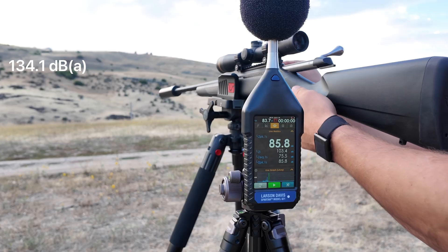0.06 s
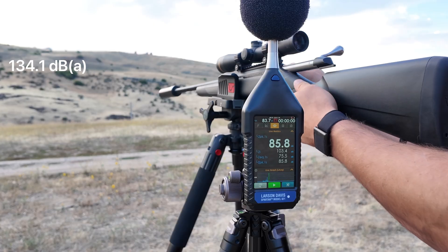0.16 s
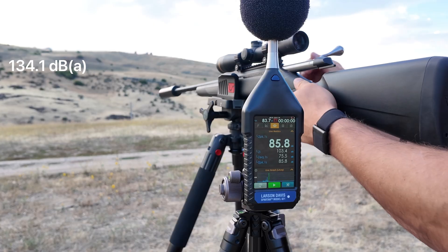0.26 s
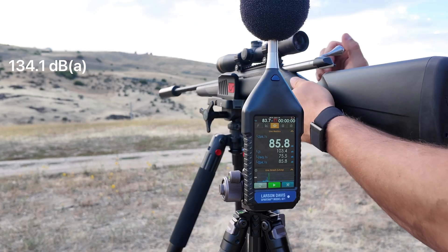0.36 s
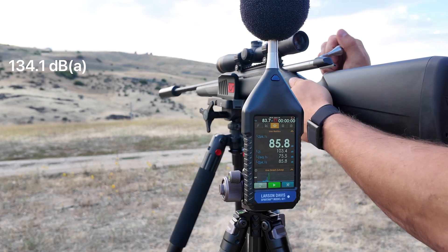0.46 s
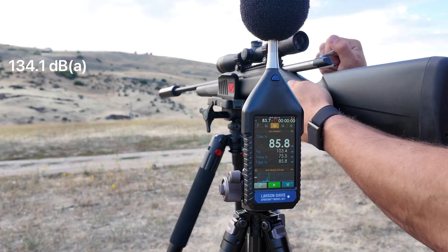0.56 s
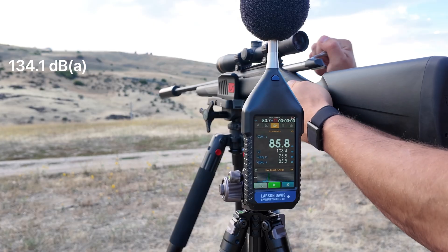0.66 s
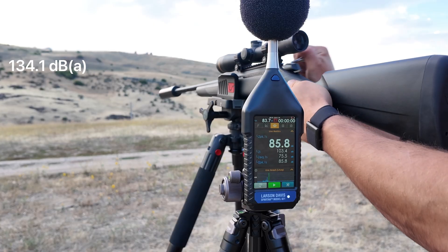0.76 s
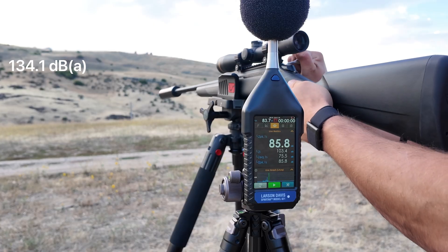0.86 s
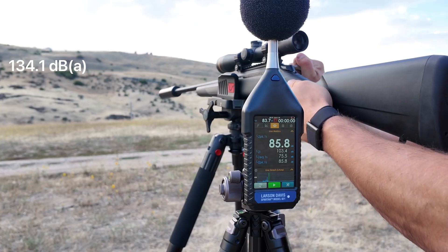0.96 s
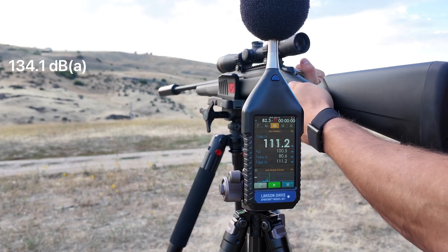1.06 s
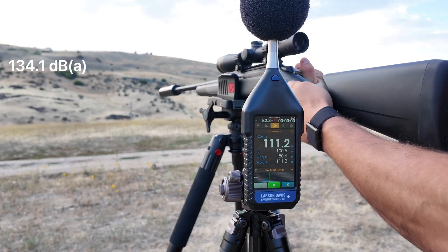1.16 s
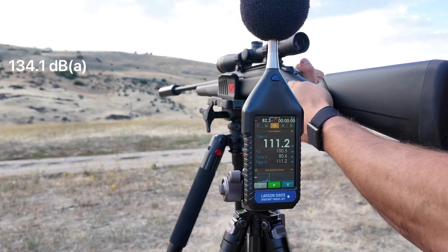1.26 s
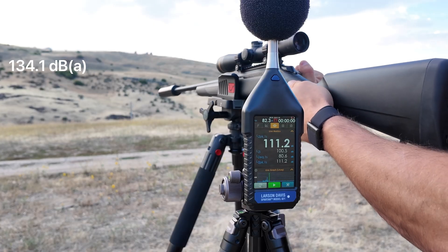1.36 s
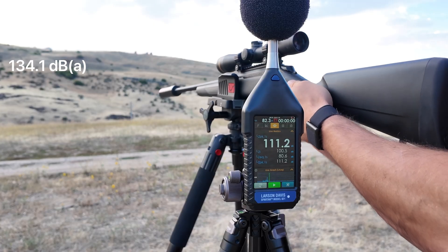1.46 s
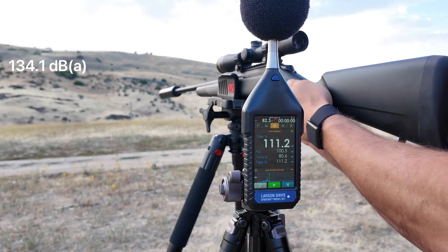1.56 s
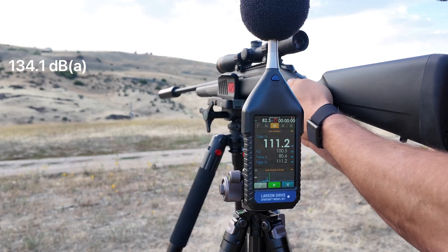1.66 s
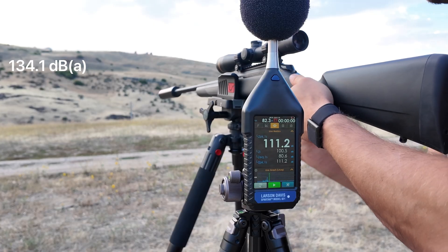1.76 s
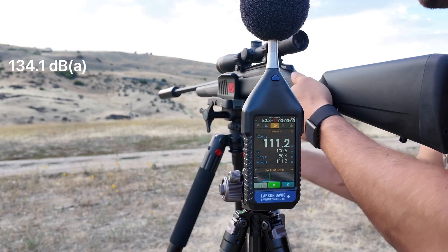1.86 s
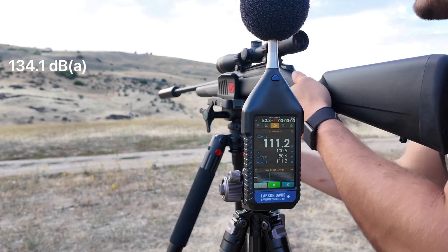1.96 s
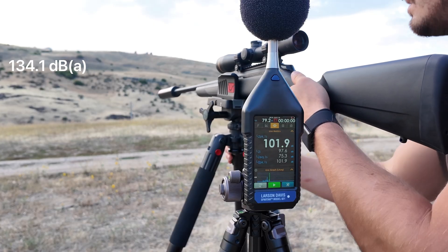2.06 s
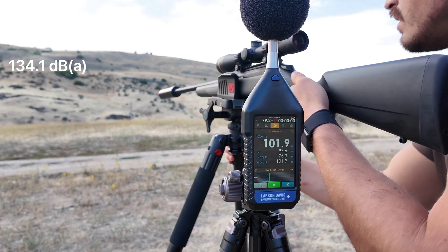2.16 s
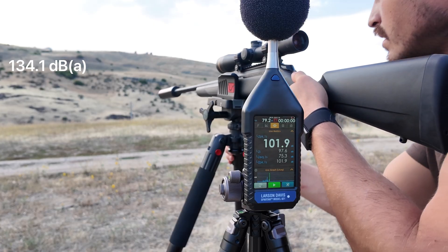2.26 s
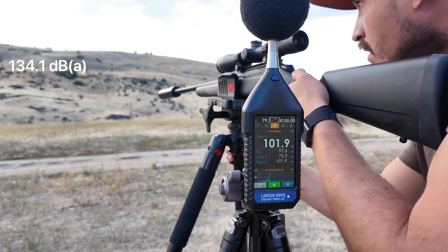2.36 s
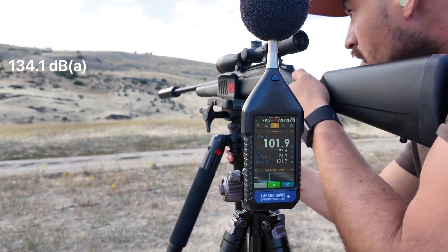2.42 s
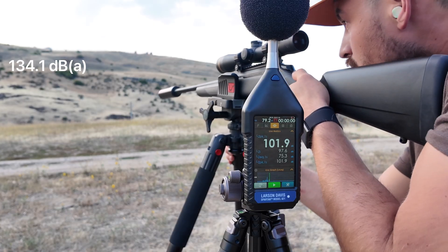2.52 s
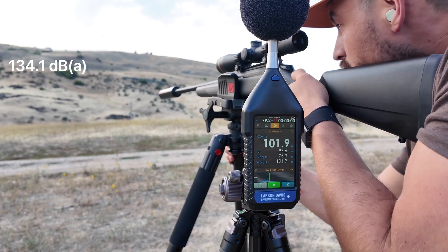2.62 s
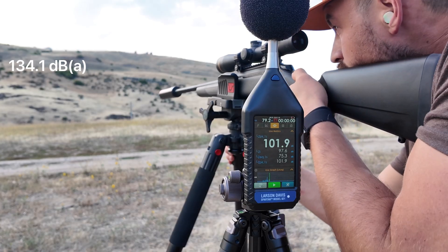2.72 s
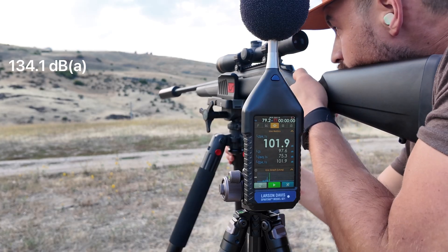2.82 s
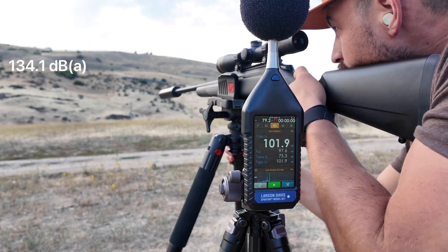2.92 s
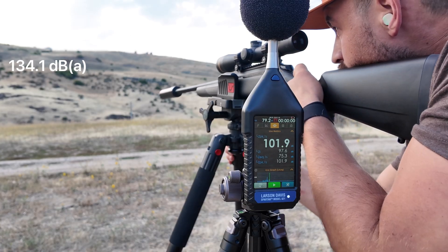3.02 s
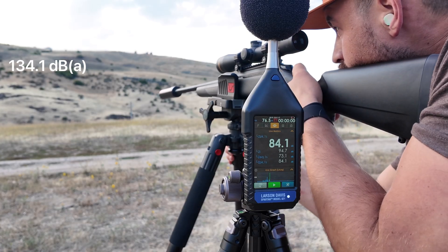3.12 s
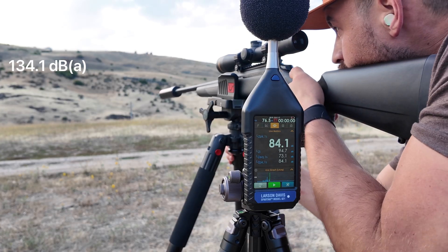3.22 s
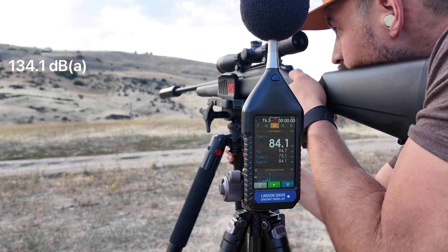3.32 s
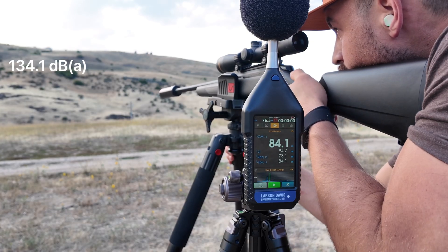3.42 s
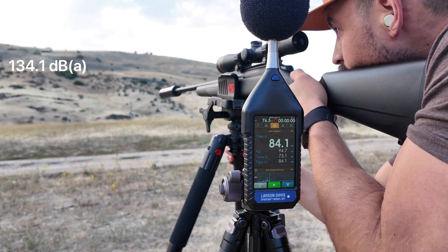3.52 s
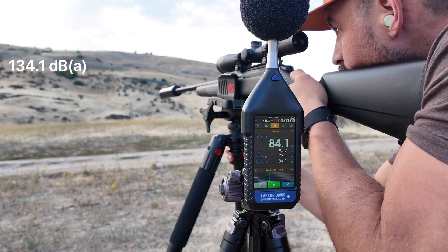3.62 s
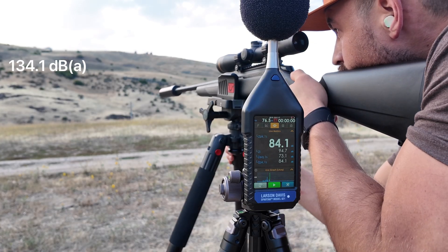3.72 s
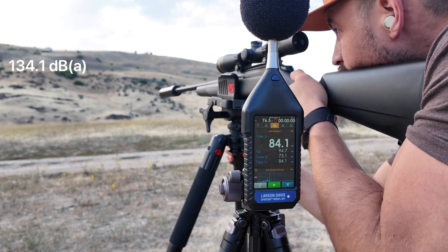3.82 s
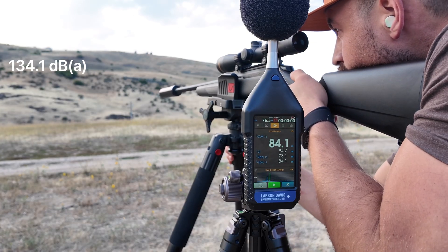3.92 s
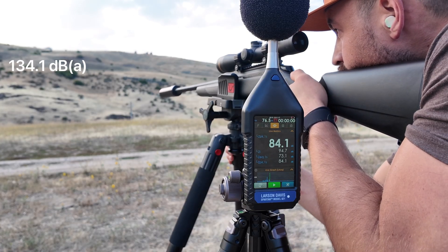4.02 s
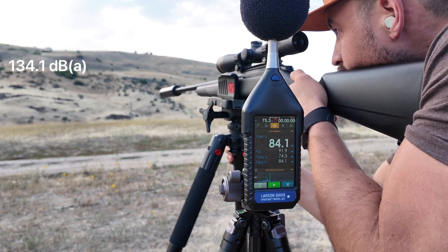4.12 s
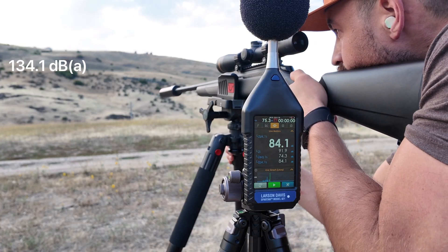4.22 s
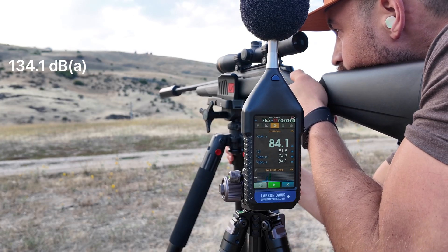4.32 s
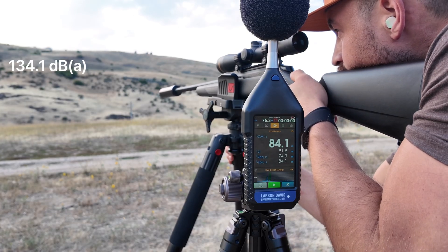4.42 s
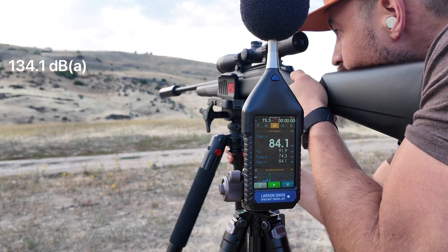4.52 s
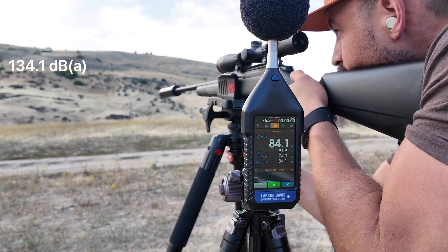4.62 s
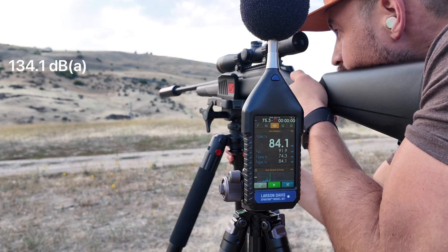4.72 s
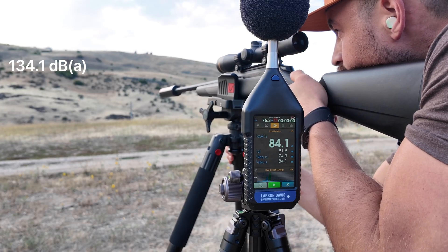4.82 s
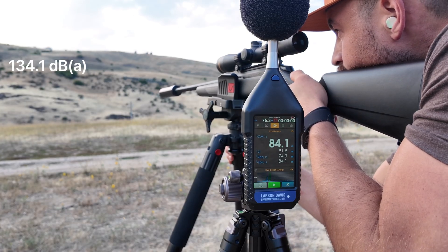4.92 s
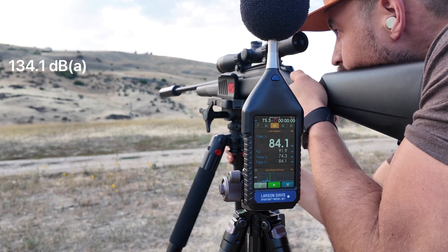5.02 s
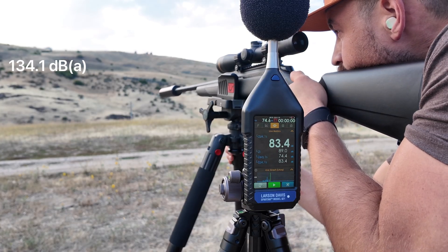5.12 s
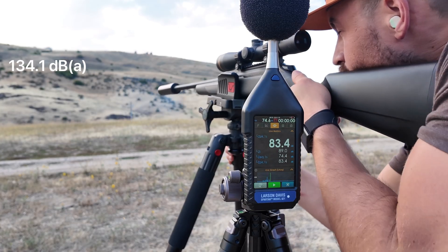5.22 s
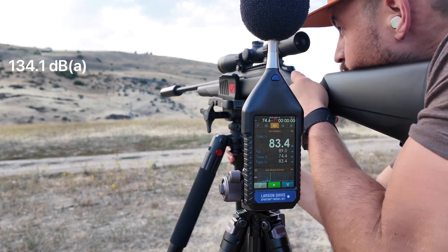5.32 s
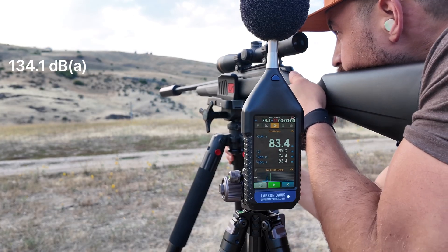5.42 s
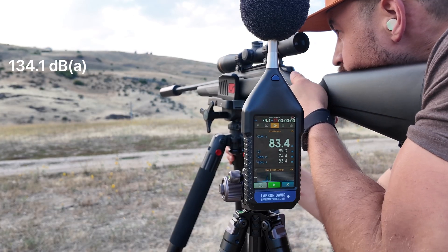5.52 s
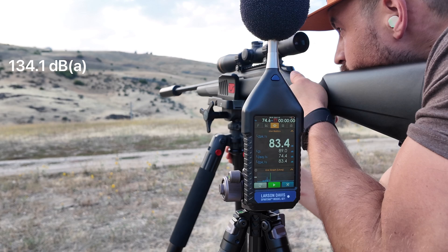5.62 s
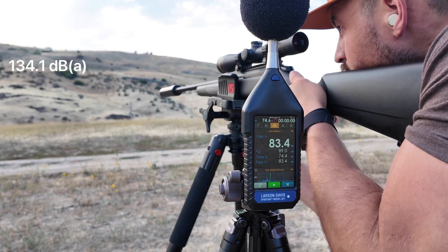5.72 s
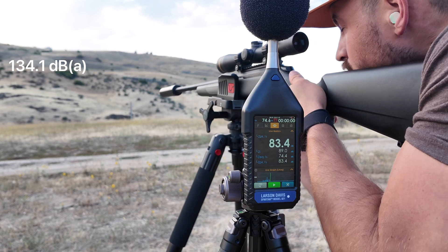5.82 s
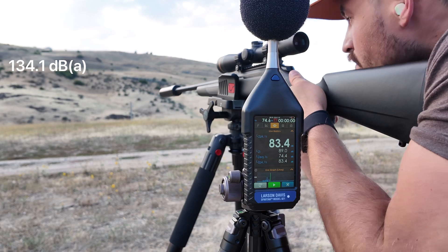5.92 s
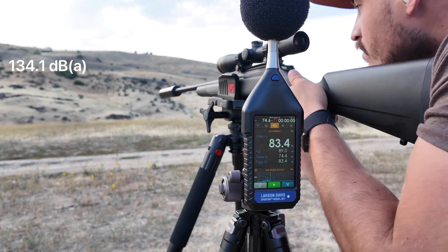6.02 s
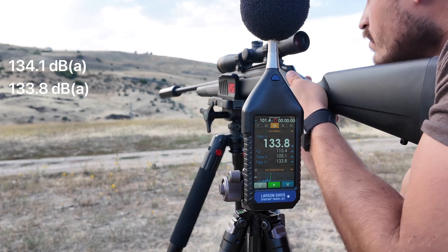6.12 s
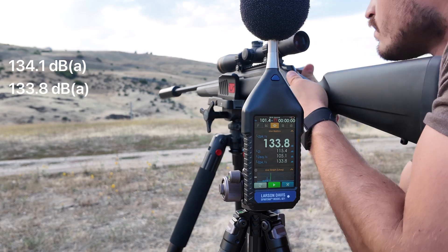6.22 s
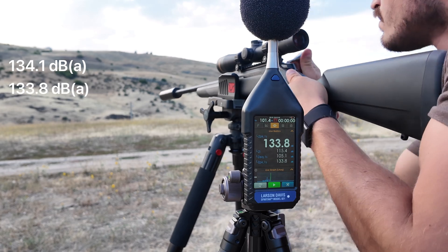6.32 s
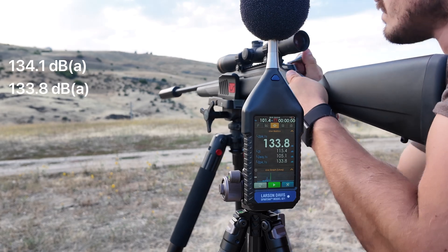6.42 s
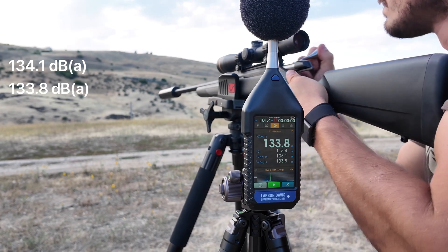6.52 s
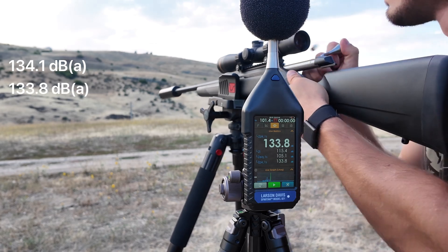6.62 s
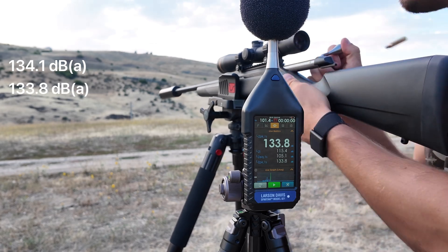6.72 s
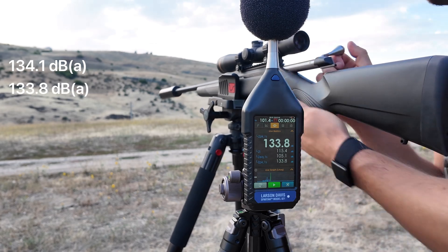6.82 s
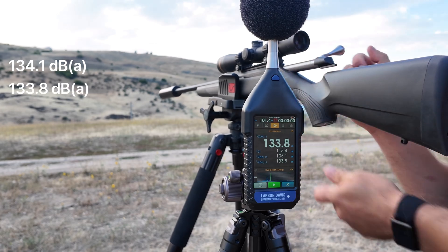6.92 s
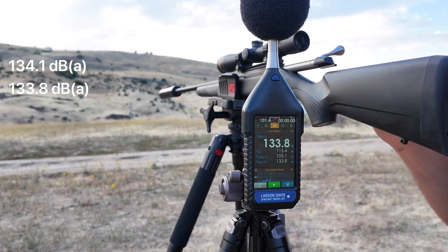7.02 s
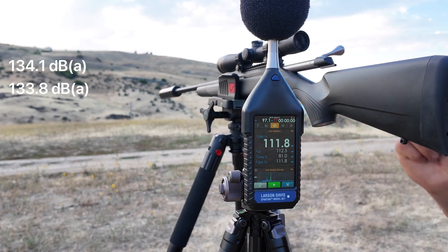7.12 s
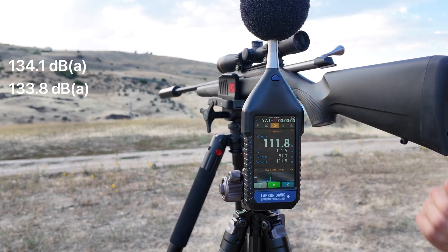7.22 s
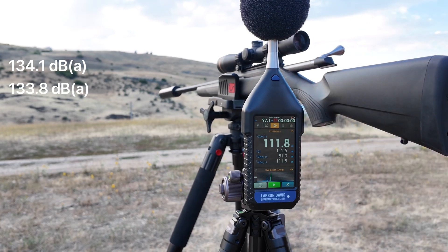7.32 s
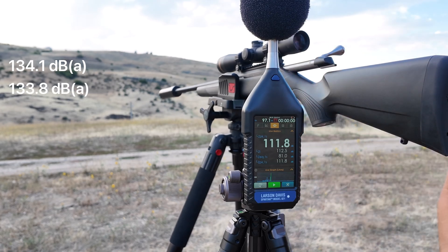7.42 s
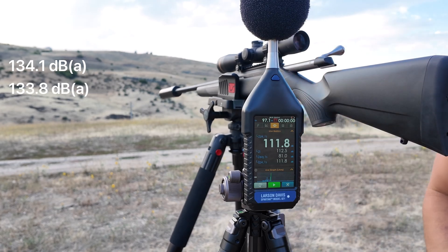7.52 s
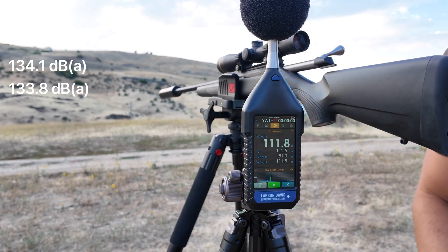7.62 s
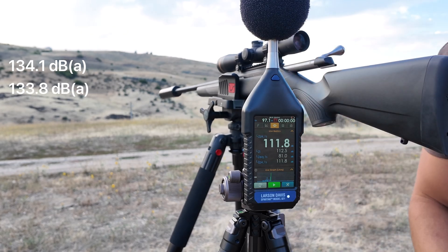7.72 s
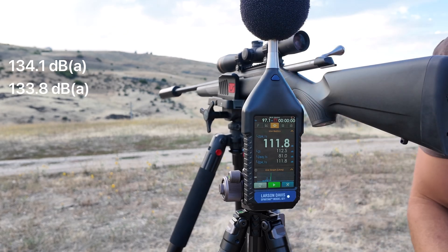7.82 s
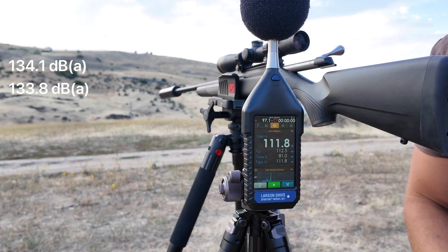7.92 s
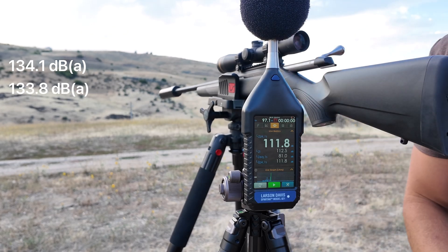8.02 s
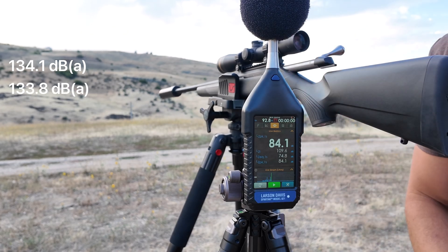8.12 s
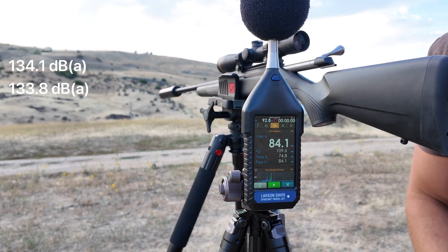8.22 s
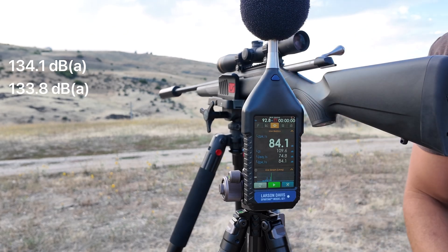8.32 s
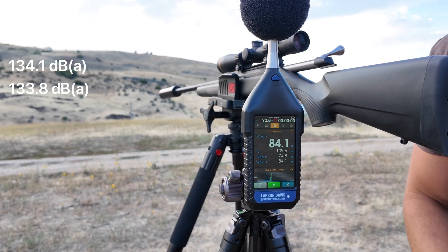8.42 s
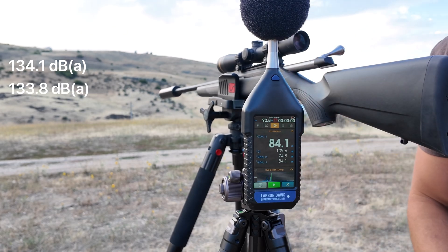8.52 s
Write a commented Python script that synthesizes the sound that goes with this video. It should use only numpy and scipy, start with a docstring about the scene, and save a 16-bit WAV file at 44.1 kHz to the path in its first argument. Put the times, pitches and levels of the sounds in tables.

```python
"""One quiet shot on an open range

A bolt-action rifle is loaded and fired once through a suppressor, close to the microphones.
Knocks of steel are short filtered noise bursts; ringing metal is a set of dying sine waves.
The shot is three bands of noise, one slow swing of pressure and sharp spikes; ground and hills
throw back the bullet's crack as many small clicks. The bolt is worked again and the empty case rings.
Insects, a faint bird, a distant drone, murmur and breeze are shaped noise and wavering tones.
"""
import sys
import numpy as np
from scipy import signal
from scipy.fft import rfft, irfft, next_fast_len
from scipy.io import wavfile
from scipy.ndimage import uniform_filter1d

SR = 44100
rng = np.random.default_rng(int(sys.argv[2]) if len(sys.argv) > 2 else 0)


def bounce(signal):
    """Save signal as a 16-bit WAV file at the path given by the first command-line argument."""
    frames = np.transpose(np.atleast_2d(signal))
    limited = np.clip(frames, -1, 1)
    pcm = np.round(limited * 32767).astype(np.int16)
    wavfile.write(sys.argv[1], SR, pcm)


N = 377496
TIME = np.arange(N) / SR

# Colours give the balance of a sound: f/Hz, level/dB per Hz (only the shape counts for steady noise).
# Swells climb to a peak and die away: t/s of the peak, level/dB, rise/s, fall/s (times for 60 dB).
# Most sounds are also leaned a little to one side, which changes the level on each side.

# Open-air background: colour
AIR_COLOUR = [(25, -36), (80, -8.5), (150, -2), (280, -5.5), (450, 0), (750, -3), (1300, -3.5), (2000, -10),
              (3500, -13.5), (5000, -17.5), (8000, -26), (11000, -25), (15200, -17.5), (16000, -22)]
# Far engine: colour of its rumble
ENGINE_COLOUR = [(25, -36), (60, -20.5), (82, -7), (96, 2.5), (108, -6.5), (140, -23.5), (300, -47)]
# Far engine: t/s, level/dB before its tone and rumble are mixed
ENGINE_LEVEL = [(0, -62.5), (2.7, -70), (4.8, -65), (6, -59.5), (8.56, -59.5)]
# Distant traffic or machinery: colour
MURMUR_COLOUR = [(200, -21.5), (450, -16), (640, -5.5), (720, -3), (800, 2), (920, -10.5), (1100, -10.5),
                 (1250, -6.5), (1500, -15), (4000, -46.5)]
# Traffic coming and going over the steady murmur: swells
TRAFFIC_PASSES = [(4.15, -65, 3.4, 7), (5.1, -57, 1.73, 4.2), (7.5, -62.5, 3.3, 7)]
# The murmur drifts from left to right: t/s, lag of the left microphone/s
MURMUR_BEARING = [(0, -.00008), (4.5, -.0001), (7.3, .00014), (8.56, .00014)]
# Gusts on the microphones, before the lean to the left: t/s, level/dB
GUSTS = [(0.1, -56.5), (0.78, -63.5), (1.2, -62.5), (1.64, -63.5), (2.02, -64.5), (2.43, -58), (2.68, -64),
         (3.07, -57), (3.269, -64.5)]
# Breeze: colour
BREEZE_COLOUR = [(20, -34.5), (36, -22), (50, -5.5), (68, 3.0), (110, -11), (250, -28), (1000, -59.0)]
# Blurred far insects: colour
CHORUS_COLOUR = [(3500, -48.5), (3900, -12), (4070, -2.5), (4300, -15), (4800, -45)]

# The cartridge is set on the action, before the trims in knocks():
# t/s, middle level/dB, bass level/dB, treble level/dB
LOADING = [(0.0546, -32, -44, -63), (0.0664, -37, -59, -61), (0.1046, -45, -44, -28.5)]
# Those knocks: colour
LOADING_COLOUR = [(100, -54), (500, -20.5), (850, -6.5), (1180, 8), (1350, 6.5), (1700, 1.5), (3300, 3),
                  (6000, -19.5), (10000, -14), (16000, -39)]
# A live cartridge is touched: t/s, level/dB before each mode's own level
CARTRIDGE_TOUCHES = [(0.056, -56), (0.073, -48), (0.104, -43), (0.126, -39.5), (0.733, -38), (0.76, -33),
                     (8.14, -60), (8.25, -62), (8.415, -58)]
# Notes of the live cartridge: f/Hz, level/dB, time to fall 60 dB/s
CARTRIDGE_MODES = [(4690, -4, .11), (4770, -2, .1), (13350, -9, .08)]
# Soft bumps on the stock and rest: t/s, level/dB, f/Hz, time to fall 60 dB/s
BUMPS = [(0.1379, -30.5, 1230, 0.12), (0.837, -34, 327, 0.089), (1.483, -49, 340, 0.041),
         (1.631, -55, 79, 0.13), (6.644, -41.5, 336, 0.12), (7.308, -24.5, 194, 0.019)]
# Skin and cloth brush the stock: swells
BRUSH = [(0.82, -62, 0.4, 0.18), (1.46, -75, 0.2, 0.2), (2.08, -68, 1, 1), (2.5, -70.5, 0.55, 0.61),
         (6.56, -56, 0.2, 0.87), (7.33, -61, 0.24, 0.99), (7.94, -73.5, 0.51, 0.5), (8.22, -69, 0.8, 0.94)]
BRUSH_COLOUR = [(500, -25), (2000, -3.0), (5000, -0.5), (8000, -2), (11000, 3.5), (16000, -9.5)]
# Duller rubbing as the shooter settles and draws the bolt: swells
SETTLE = [(2.51, -55, 0.35, 0.24), (6.54, -60, 0.19, 0.9), (6.76, -51.5, 0.37, 0.45)]
SETTLE_COLOUR = [(150, -20.0), (600, -0.5), (1300, 4), (2300, -3.5), (4000, -22), (12000, -24)]
# Far bird: t/s, level/dB of each call
BIRD_CALLS = [(0.5, -75), (2.97, -68), (3.708, -66.5), (4.4, -69), (7.5, -71), (8.11, -69)]
# Shape of one call: t/s from its start, f/Hz, level/dB relative to the call
CALL_SHAPE = [(0, 3750, -2), (.045, 3300, -3.5), (.08, 2550, -2.5), (.097, 3700, -1), (.115, 4100, -5)]
# The bolt strikes its stops as it closes, locks, lifts and is drawn back, before the trims in knocks():
# t/s, middle level/dB, bass level/dB, treble level/dB
BOLT_KNOCKS = [(0.6413, -38, -49, -74), (0.7027, -25, -52, -55), (0.7223, -27, -46, -44),
               (0.7315, -21.5, -40, -34), (0.7414, -19, -46, -26), (0.7589, -24, -42, -29),
               (0.7884, -18, -50, -28), (0.794, -7, -22.5, -18.5), (0.81, -11, -41, -25),
               (0.824, -11.5, -30.5, -19), (0.8334, -28, -22, -30.5), (0.9802, -41.5, -48.5, -78),
               (1.0335, -39, -45.5, -78), (1.2121, -53, -60, -84), (1.4691, -29, -39.5, -40),
               (2.2323, -50, -59.5, -54.5), (6.132, -24.5, -68, -38.5), (6.1578, -26.5, -47, -42),
               (6.2754, -22, -44.5, -45), (6.282, -21, -46, -26.5), (6.2982, -23.5, -38, -28),
               (6.555, -21, -63, -43), (6.5666, -23.5, -63, -38), (6.5855, -17.5, -44, -33),
               (6.6233, -21.5, -39, -31.5), (6.6334, -29, -31.5, -39), (6.6434, -30.5, -28, -35),
               (6.779, -25.5, -34, -37.5)]
# Those knocks: colour
BOLT_COLOUR = [(30, -57.5), (100, -26.5), (400, -23), (740, -9.5), (1050, -14.5), (1570, -5), (1900, -6),
               (2200, -6), (2500, -12), (3150, -10), (5000, -17), (7500, -25), (9300, -20.5),
               (12600, -25.5), (16000, -35)]
# The bolt scrapes along its raceway: swells
SCRAPES = [(0.703, -44, 0.12, 0.3), (0.775, -36.5, 0.17, 0.2), (1.003, -57, 0.099, 0.27),
           (1.449, -42.5, 0.037, 0.14), (6.595, -36, 0.21, 0.24)]
# The bolt is left free to ring: t/s, level/dB before each mode's own level
BOLT_RINGS = [(0.824, -48), (1.469, -56), (6.644, -46), (6.779, -63)]
# Notes of the bolt: f/Hz, level/dB, time to fall 60 dB/s
BOLT_MODES = [(410, -2, 0.13), (1290, -11.5, .12), (2120, 0.5, 0.33), (2250, -6.5, 0.33), (2300, -5.5, .3),
              (2640, -7, .2), (5850, -15, 0.19), (8900, -9, 0.13), (9600, -3, 0.13)]

# Three parts of the shot, from low to high: colours
BOOM_COLOUR = [(20, -22), (80, -4), (250, -3.5), (400, -5), (700, -22.5), (2000, -63.5)]
ROAR_COLOUR = [(100, -29), (400, -7.5), (900, -1), (1500, -0.5), (2500, -2), (4000, 0.5), (6000, 0.5),
               (8000, -16), (16000, -37.5)]
HISS_COLOUR = [(1000, -32.5), (4500, -16), (7000, -3), (11000, 3), (15500, 1.5), (17000, -3.5)]
# Sharp fronts of the muzzle blast and the crack's clearest returns:
# t/s (the peak comes two lengths later), peak level/dB, length/s
FRONTS = [(5.1845, -7, .00026), (5.8692, -20, .00009), (5.893, -18, .00009), (5.9021, -16, .00016),
          (5.9192, -24, .00011)]
# The crack thrown back by patches of ground and scrub: swells
SCRUB = [(5.235, -34, 0.1, 0.55), (5.342, -25.5, 0.53, 0.35), (5.414, -34, 0.05, 0.033),
         (5.468, -34.5, 0.12, 0.28), (5.558, -47, 0.17, 0.88), (5.683, -36.5, 0.03, 0.06),
         (5.702, -33.5, 0.068, 0.077), (5.745, -46, 0.15, 0.3), (6.08, -46, 1, 0.92)]
# Near returns, before losses on the way: colour
NEAR_COLOUR = [(100, -31), (300, -6), (550, -8.5), (900, -14), (1500, -5), (3300, 3), (5000, 0.5),
               (8000, -6.5), (16000, -4)]
# Far returns, for a centre of 2500 Hz and moved to other centres: colour
FAR_COLOUR = [(200, -39), (500, -21.5), (800, -6), (1500, 1), (2800, 7), (4000, 3), (5500, -6),
              (8500, -25.5), (16000, -61)]
# Steep faces of the hill answer more strongly: swells
HILL_FACES = [(5.895, -24, 0.17, 0.084), (6.247, -45, 0.12, 0.65)]
# The muzzle's boom rolling round the range: swells
ROLL = [(5.355, -31, 0.044, 0.07), (5.385, -47, 0.7, 1), (5.703, -48, 0.036, 0.13)]
# The rolling boom: colour
ROLL_COLOUR = [(20, -27.5), (50, -9.5), (100, 5.5), (170, 1), (260, -14.5), (500, -41), (1500, -74.5)]
# The empty brass case is touched: t/s, level/dB before each mode's own level
CASE_TOUCHES = [(6.556, -44), (6.587, -39), (6.625, -38), (6.645, -39), (7.565, -67.5), (7.661, -61.5)]
# Notes of the empty case: f/Hz, level/dB, time to fall 60 dB/s
CASE_MODES = [(10894, -3.5, 0.15), (11010, -8, 0.13), (15300, -4, 0.075)]

# When the first gas escapes and when the flow is fullest (s)
SHOT_S, FULL_FLOW_S = 5.162, 5.19


def amp(db):
    """Turns decibels into gain."""
    return 10 ** (np.asarray(db) / 20)


def unit(x):
    """Scales a signal to an rms of one."""
    return x / np.sqrt(np.mean(x ** 2) + 1e-20)


def read(points, hz):
    """Reads a colour table in dB, on a log-frequency axis."""
    f, db = np.transpose(points)
    return np.interp(np.log(hz + 1), np.log(f + 1), db)


def level(rows):
    """Turns a curve of dB over time into a gain."""
    return amp(np.interp(TIME, *np.transpose(rows)))


def lean(left_db):
    """Gains that put the left side left_db above the right; negative favours the right."""
    return amp(np.array([[.5], [-.5]]) * left_db)


def swell(s, db, rise_s, fall_s, hold_s=0):
    """Climbs to its peak at s, holds and dies away, down to a floor 120 dB below the peak."""
    before = np.maximum(s - TIME, 0) / rise_s
    after = np.maximum(TIME - s - hold_s, 0) / fall_s
    return amp(db - 60 * np.minimum(before + after, 2))


def swells(rows):
    """Joins several swells by adding their powers."""
    return np.sqrt(sum(swell(*row) ** 2 for row in rows))


def add(mix, s, sound):
    """Adds a sound to the mix, starting at s seconds."""
    part = mix[:, round(s * SR):][:, :sound.shape[-1]]
    part += sound[..., :part.shape[1]]


def pair(three, alike_hz, lag_s=0):
    """Two microphones share the bass, differ above alike_hz, and hear the shared part lag_s apart."""
    size = three.shape[1]
    spectra, hz = rfft(three), np.fft.rfftfreq(size, 1 / SR)
    share = 1 / (1 + (hz / alike_hz) ** 2)
    delay = np.exp(np.pi * 1j * hz * lag_s * np.array([[-1], [1]]))
    common = spectra[0] * np.sqrt(share) * delay
    separate = spectra[1:] * np.sqrt(1 - share)
    return irfft(common + separate, size)


def noise(colour, alike_hz, lag_s=0):
    """Steady stereo noise of a given colour, with an rms of one."""
    size = next_fast_len(N)
    spectrum = rfft(pair(rng.standard_normal((3, size)), alike_hz, lag_s))
    gain = amp(read(colour, np.fft.rfftfreq(size, 1 / SR)))
    return unit(irfft(spectrum * gain, size)[:, :N])


def tint(x, db):
    """Minimum-phase filter with a gain for each frequency bin, so that attacks stay sharp."""
    log_gain = np.log(amp(np.r_[db, db[-2:0:-1]]))
    response = np.exp(np.conj(signal.hilbert(log_gain)))[:len(db)]
    return irfft(rfft(x) * response)


def ring(modes):
    """Metal rings as dying sine waves, which start at slightly different phases left and right."""
    t = np.arange(SR // 2) / SR
    onset = 1 - np.exp(-t / 0.0012)
    total = 0
    for hz, db, t60 in modes:
        turns = hz * t + rng.random()
        side_phase = rng.normal(0, 0.52, (2, 1))
        total = total + amp(db - 60 * t / t60) * np.sin(2 * np.pi * turns + side_phase)
    return onset * total


def touches(rows, modes):
    """Each touch sets the same set of notes ringing afresh."""
    out = np.zeros((2, N))
    for s, db in rows:
        add(out, s, amp(db) * ring(modes))
    return out


def knocks(rows, colour, t60, low_hz, low_db, treble_db, treble_share, rise_s, tail_db, tail_t60,
           gain_db, lag_s):
    """Steel on steel is a noise burst with a quick decay and a weak tail; the treble's quick part dies first."""
    out, size = np.zeros((2, N)), 8192
    t, hz = np.arange(size) / SR, np.fft.rfftfreq(size, 1 / SR)
    low = 1 / (1 + (hz / low_hz) ** 4)
    below_top = 1 / (1 + (hz / 6000) ** 8)
    body_db = read(colour, hz)
    body_db = body_db - 10 * np.log10(np.mean(amp(body_db) ** 2)) + gain_db
    for s, middle_db, bass_db, top_db in rows:
        bass_lift = low * (bass_db - middle_db + low_db)
        middle = body_db + middle_db + bass_lift + 10 * np.log10(below_top)
        top = body_db + top_db + treble_db + 10 * np.log10(1 - below_top + 1e-6)
        for db, decay in (middle, t60), (top, t60 * treble_share):
            fall = amp(-60 * t / decay) + amp(tail_db - 60 * t / tail_t60)
            shape = fall * (1 - np.exp(-t / rise_s))
            burst = pair(rng.standard_normal((3, size)), 6300, lag_s)
            add(out, s, tint(burst * shape, db))
    return out


def open_air(level_db=-69):
    """Still outdoor air is a steady, soft noise."""
    return amp(level_db) * noise(AIR_COLOUR, 650)


def engine(hz=96, wander=0.047, tone_db=-6, rumble_db=-1.5):
    """The drone of a far engine is one wavering low note in its own rumble."""
    drift = unit(uniform_filter1d(rng.standard_normal(N), SR // 8))
    note = unit(np.sin(2 * np.pi * np.cumsum(hz * (1 + wander * drift)) / SR))
    rumble = noise(ENGINE_COLOUR, 500)
    return level(ENGINE_LEVEL) * (amp(tone_db) * note + amp(rumble_db) * rumble)


def distant_murmur(steady_db=-75):
    """Distant traffic or machinery is swelling noise; a changing delay on the left moves it across."""
    murmur = np.hypot(amp(steady_db), swells(TRAFFIC_PASSES)) * noise(MURMUR_COLOUR, 2000)
    left_lag = np.interp(TIME, *np.transpose(MURMUR_BEARING))
    murmur[0] = np.interp(TIME - left_lag, TIME, murmur[0])
    return murmur


def breeze(steady_db=-76, rise_s=.4, fall_s=1):
    """Gusts over a faint steady breeze are deep noise, stronger on the left microphone."""
    gusts = swells([(s, db, rise_s, fall_s) for s, db in GUSTS])
    wind = np.hypot(amp(steady_db), gusts)
    return wind * noise(BREEZE_COLOUR, 30) * lean(8)


def insects(hz=4120, sweep_hz=520, pulses_per_s=51, stroke_width=.2, near_db=-73.5, chorus_db=-74.5):
    """Each wing stroke of the nearest insect is a short falling whistle; others blur into a narrow buzz."""
    pace_drift = unit(uniform_filter1d(rng.standard_normal(N), SR // 5))
    pace = pulses_per_s * (1 + 0.014 * pace_drift)
    stroke = np.cumsum(pace) / SR % 1 - .5  # place within one wing stroke, -0.5 to 0.5
    waver = unit(uniform_filter1d(rng.standard_normal((2, N)), 200))
    pitch = hz - sweep_hz * stroke + 45 * waver
    whistle = np.sin(2 * np.pi * np.cumsum(pitch, axis=1) / SR)
    song = np.exp(-(stroke / stroke_width) ** 2) * whistle
    flicker = amp(1.6 * waver[::-1])  # each side's level follows the other side's waver
    return amp(near_db) * unit(song * flicker) + amp(chorus_db) * noise(CHORUS_COLOUR, 4500)


def rattle(count=5, drop_s=.1243, bounce_s=.0138, loss_db=3.5, treble_loss_db=4):
    """The dropped cartridge bounces at an even pace and loses strength each time; gives LOADING rows."""
    return [(drop_s + k * bounce_s, -39 - k * loss_db, -17 - k * loss_db, -33.5 - k * treble_loss_db)
            for k in range(count)]


def loading():
    """The cartridge knocks on the steel action, drops in and rattles."""
    return lean(-1.1) * knocks(
        LOADING + rattle(), LOADING_COLOUR, t60=0.058, low_hz=1770, low_db=-0.5, treble_db=7.5,
        treble_share=0.4, rise_s=0.0004, tail_db=-14.0, tail_t60=0.087, gain_db=-1.5, lag_s=.00004)


def cartridge_ringing():
    """A live cartridge gives a few high, short-lived notes when touched."""
    return lean(-1.1) * touches(CARTRIDGE_TOUCHES, CARTRIDGE_MODES)


def stock_bumps():
    """A soft bump is one dying tone with a weaker, faster-dying tone 3.7 times higher."""
    out, t = np.zeros((2, N)), np.arange(SR // 4) / SR
    for s, db, hz, t60 in BUMPS:
        overtone = 0.51 * amp(-60 * t / t60) * np.sin(2 * np.pi * 3.7 * hz * t)
        thud = np.cos(2 * np.pi * hz * t) + overtone
        add(out, s, amp(db - 60 * t / t60) * (1 - np.exp(-t / 0.0013)) * thud)
    return out * lean(-1.1)


def handling():
    """Arm, shoulder and bolt rub on the rifle: noise with fine, uneven changes of level."""
    grain = amp(2 * unit(uniform_filter1d(rng.standard_normal(N), 200)))
    brush = swells(BRUSH) * noise(BRUSH_COLOUR, 4000, .00005) * lean(-7.5)
    settle = swells(SETTLE) * noise(SETTLE_COLOUR, 4000, .00007)
    return grain * (brush + settle)


def bird(flutter_hz=70):
    """A thin, fluttering whistle dips and flicks back up, with a weak octave above it."""
    out, (s, hz, db) = np.zeros((2, N)), np.transpose(CALL_SHAPE)
    t = np.arange(0, s[-1], 1 / SR)
    for start, call_db in BIRD_CALLS:
        flutter = flutter_hz * unit(uniform_filter1d(rng.standard_normal((2, len(t))), 100))
        phase = 2 * np.pi * np.cumsum(np.interp(t, s, hz) + flutter, axis=1) / SR
        whistle = np.sin(phase) + 0.16 * np.sin(2 * phase)
        add(out, start, amp(call_db + np.interp(t, s, db)) * whistle)
    return out


def scraping(chatter_db=4.0, edge_hz=3800, lag_s=.000045):
    """The sliding bolt catches and slips at random, a little duller than its knocks."""
    chatter = unit(amp(chatter_db * unit(uniform_filter1d(rng.standard_normal(N), size=130))))
    colour = [(hz, db - 10 * np.log10(1 + (hz / edge_hz) ** 2)) for hz, db in BOLT_COLOUR]
    return swells(SCRAPES) * chatter * noise(colour, 6300, lag_s) * lean(-1.1)


def bolt_knocks():
    """The steel bolt strikes its stops in short, dense knocks."""
    return lean(-1.1) * knocks(
        BOLT_KNOCKS, BOLT_COLOUR, t60=0.031, low_hz=990, low_db=13, treble_db=15.5,
        treble_share=0.51, rise_s=0.0012, tail_db=-27, tail_t60=0.15, gain_db=-1, lag_s=.000045)


def bolt_ringing():
    """The bolt, left free, rings on with its own notes."""
    return lean(-1.1) * touches(BOLT_RINGS, BOLT_MODES)


def report(open_s=.0027, swing_s=5.178, swing_hz=45, swing_db=-22, swing_width_s=.009, swing_lag_s=.0014):
    """The suppressor lets the gas out as a turbulent rush riding on one slow swing of pressure."""
    opening = 1 - np.exp(-np.maximum(TIME - SHOT_S, 0) / open_s)
    boom_level = swell(FULL_FLOW_S, db=-24.5, rise_s=.13, fall_s=.03, hold_s=.019)
    roar_level = swell(FULL_FLOW_S, db=-14.0, rise_s=0.087, fall_s=0.084, hold_s=0.0088)
    hiss_level = swell(FULL_FLOW_S, db=-13.0, rise_s=.075, fall_s=.065, hold_s=0.012)
    boom = boom_level * noise(BOOM_COLOUR, 700)
    roar = roar_level * noise(ROAR_COLOUR, 3000, -0.000021)
    hiss = hiss_level * noise(HISS_COLOUR, 14000, -0.000021)
    # the slow push of air reaches the left side first
    t = TIME - swing_s + swing_lag_s * np.array([[.5], [-.5]])
    swing = -np.sin(2 * np.pi * swing_hz * t) * np.exp(-(t / swing_width_s) ** 2 / 2)
    return opening * (boom + roar + hiss + amp(swing_db) * swing)


def fronts():
    """Each front is a rounded spike of pressure between two shallow suctions."""
    out, t = np.zeros((2, N)), np.arange(SR // 50) / SR
    for s, db, length in FRONTS:
        u = t / length - 4  # zero at the peak
        add(out, s - 2 * length, amp(db) * (1 - u ** 2) * np.exp(-u ** 2 / 2))
    return out


def scatter(colour_db, per_s, spread_db, alike_hz, lag_s):
    """Many small reflections are random clicks of uneven size, coloured by their time of arrival."""
    sizes = amp(spread_db * np.minimum(rng.exponential(1, (3, N)), 4)) * rng.choice([-1, 1], (3, N))
    arrives = rng.random((3, N)) < per_s / SR
    clicks = pair(sizes * arrives, alike_hz, lag_s)
    hz, t, spectrum = signal.stft(clicks, SR, nperseg=256, noverlap=192)
    gain = amp(colour_db(hz[:, None], t))
    spectrum = spectrum * gain / np.sqrt(np.mean(gain ** 2, axis=0))
    return unit(signal.istft(spectrum, SR, nperseg=256, noverlap=192)[1][:, :N])


def ground(hz, s, steepness=7.1, air_edge_hz=3880, dip_hz=430, dip_db=11.5, dip_delay_s=.28):
    """Longer paths lose more treble to the air and more low mids to the soft ground."""
    delay = np.clip(s - FULL_FLOW_S, .01, 1)
    # the treble edge falls with the root of the delay, to air_edge_hz after one second
    air_loss = 10 * np.log10(1 + (hz * np.sqrt(delay) / air_edge_hz) ** steepness)
    dip_depth = dip_db * np.minimum(delay / dip_delay_s, 1) ** 4
    dip = dip_depth * np.exp(-np.log2((hz + 1) / dip_hz) ** 2)
    return read(NEAR_COLOUR, hz) - air_loss - dip


def ground_echoes():
    """Patches of ground and scrub throw back the crack as a dense scatter of reflections."""
    near = swells(SCRUB) * scatter(ground, per_s=18000, spread_db=5.0, alike_hz=2200, lag_s=-0.00013)
    return (TIME > FULL_FLOW_S) * near * lean(0.84)


def rolling_boom():
    """The bass of the muzzle's boom rolls on by itself as swelling low noise."""
    return (TIME > FULL_FLOW_S) * swells(ROLL) * noise(ROLL_COLOUR, 1500)


def bank_slap(centre_hz=3970):
    """A nearby bank gives one clear slap, a brief scatter of nearly even reflections."""
    def colour(hz, s):
        return read(FAR_COLOUR, hz * 2500 / centre_hz)
    slap_level = swell(5.3995, db=-25, rise_s=0.034, fall_s=.045)
    slap = slap_level * scatter(colour, per_s=19000, spread_db=0.5, alike_hz=2975, lag_s=-0.000062)
    return (TIME > FULL_FLOW_S) * slap * lean(0.84)


def hillside(hz, s, bright_hz=2863, dull_hz=1510, dulling_at_s=5.99, dulling_s=.055, edge_hz=4200, drop_db=7):
    """The return grows duller as the crack moves off along the slope; air takes more above a fixed edge."""
    moved = .5 + .5 * np.tanh((s - dulling_at_s) / dulling_s)
    centre_hz = bright_hz + (dull_hz - bright_hz) * moved
    air_loss = drop_db / (1 + (edge_hz / (hz + 1)) ** 20)
    return read(FAR_COLOUR, hz * 2500 / centre_hz) - air_loss


def hill_echoes():
    """The crack sweeps along the hillside, and steep faces answer more strongly."""
    sweep = swell(5.825, db=-35, rise_s=0.11, fall_s=0.73, hold_s=0.2)
    slope = np.hypot(sweep, swells(HILL_FACES))
    far = slope * scatter(hillside, per_s=4000, spread_db=4.5, alike_hz=5970, lag_s=-0.000038)
    return (TIME > FULL_FLOW_S) * far * lean(1.0)


def case_ringing():
    """The empty brass case rings with very high notes when touched."""
    return lean(-1.1) * touches(CASE_TOUCHES, CASE_MODES)


def scene():
    """Adds up everything on the range."""
    quiet = open_air() + engine() + distant_murmur() + breeze() + insects() + bird()
    loaded = loading() + cartridge_ringing() + stock_bumps() + handling()
    bolt = scraping() + bolt_knocks() + bolt_ringing()
    shot = report() + fronts()
    echoes = ground_echoes() + rolling_boom() + bank_slap() + hill_echoes()
    return quiet + loaded + bolt + shot + echoes + case_ringing()


def record(dry):
    """Clips peaks at 0.85, then filters away what lies above about 16 kHz."""
    clipped = np.clip(dry, -.85, .85)
    lowpass = signal.firwin(401, 16000, window=("kaiser", 8), fs=SR)
    return signal.oaconvolve(clipped, lowpass[None], "same")


dry = scene()
out = record(dry)
bounce(out)
```